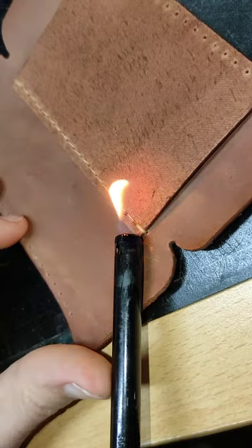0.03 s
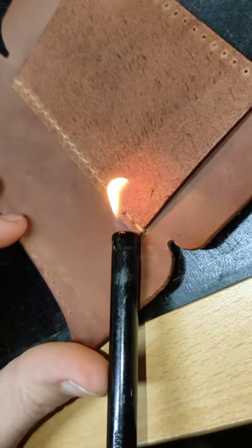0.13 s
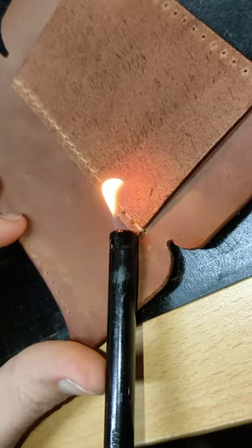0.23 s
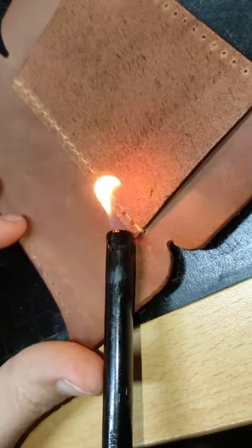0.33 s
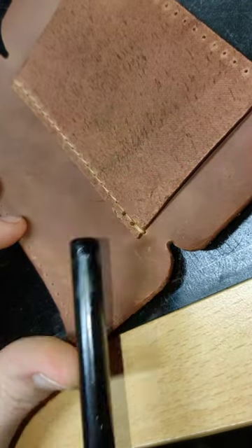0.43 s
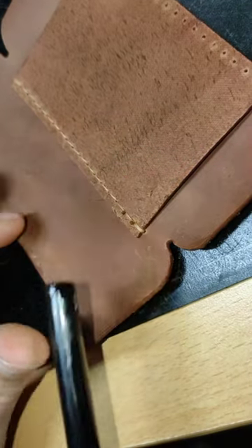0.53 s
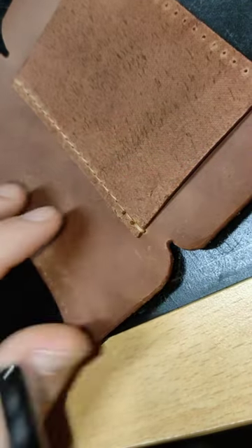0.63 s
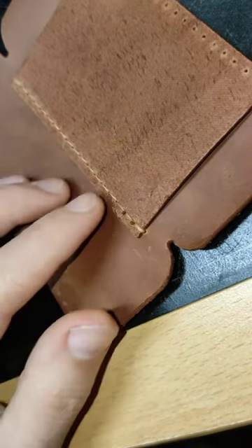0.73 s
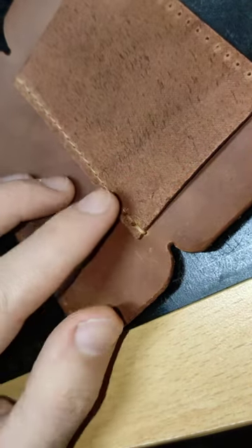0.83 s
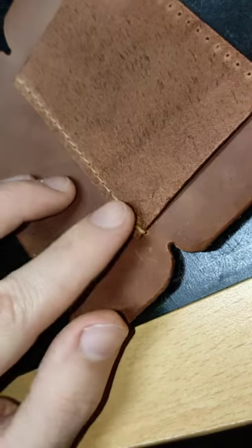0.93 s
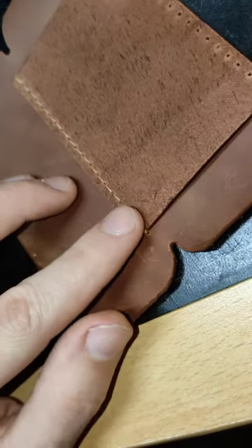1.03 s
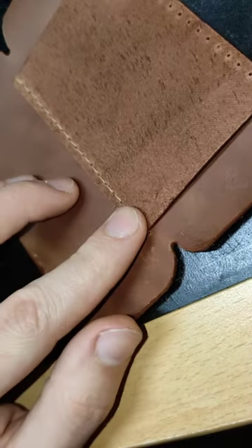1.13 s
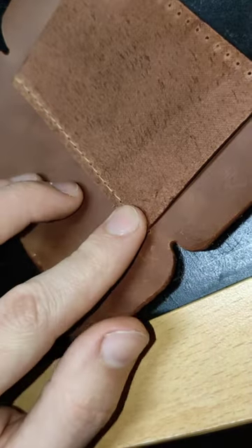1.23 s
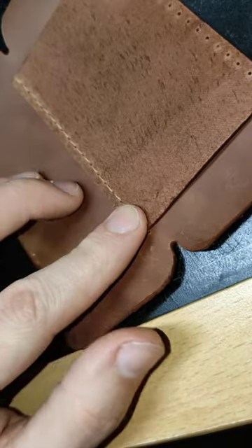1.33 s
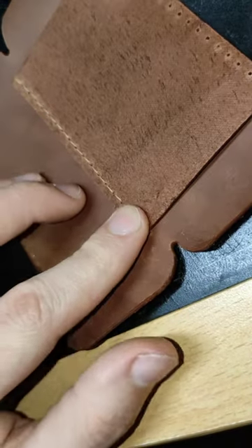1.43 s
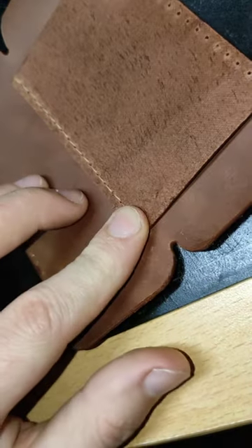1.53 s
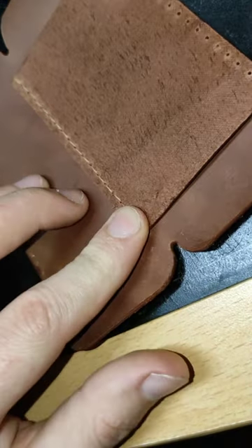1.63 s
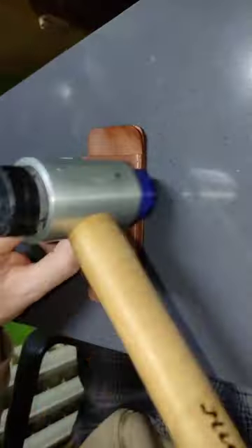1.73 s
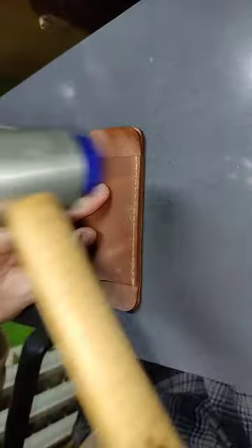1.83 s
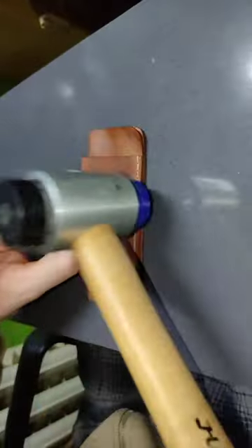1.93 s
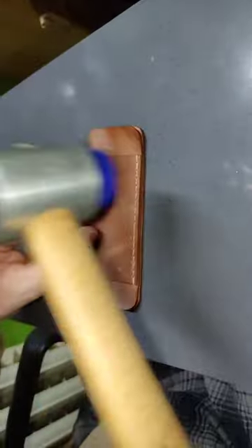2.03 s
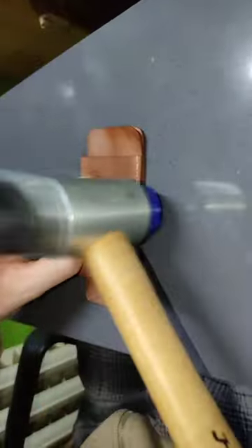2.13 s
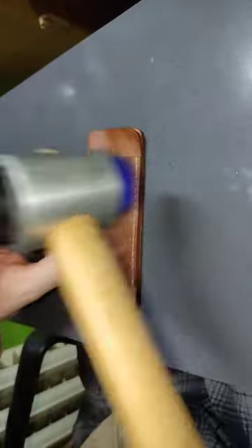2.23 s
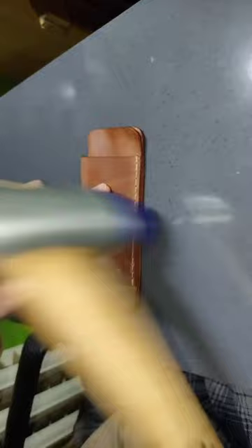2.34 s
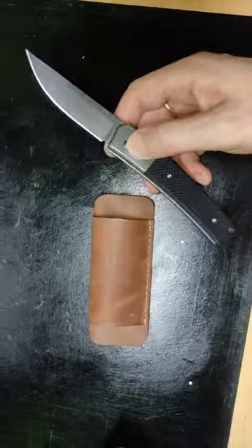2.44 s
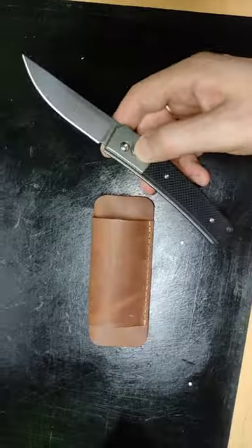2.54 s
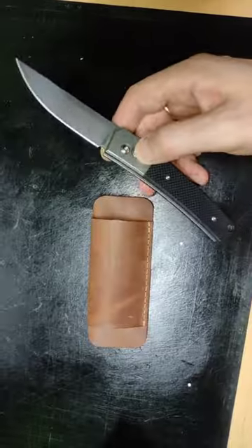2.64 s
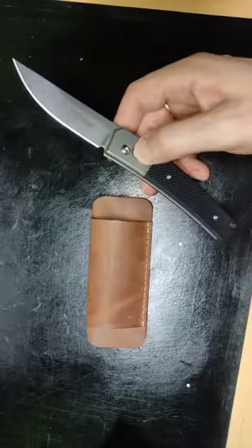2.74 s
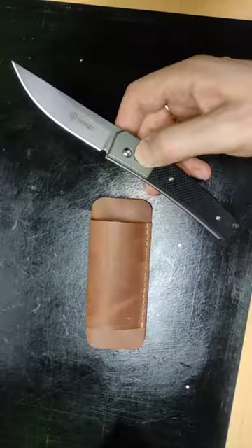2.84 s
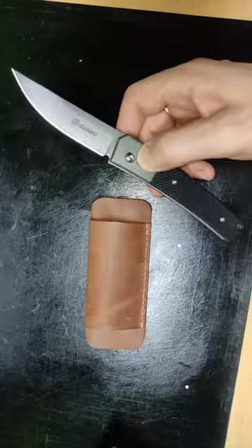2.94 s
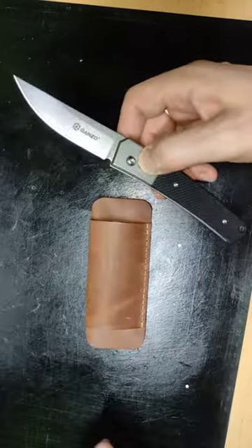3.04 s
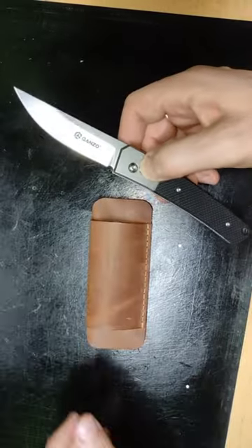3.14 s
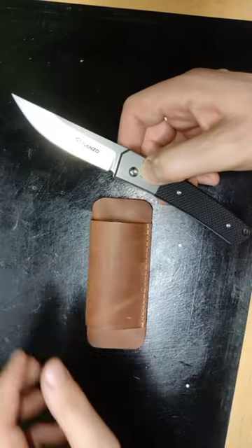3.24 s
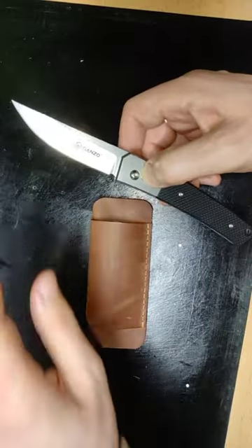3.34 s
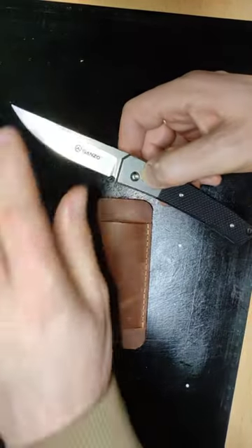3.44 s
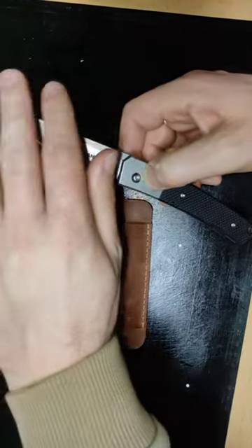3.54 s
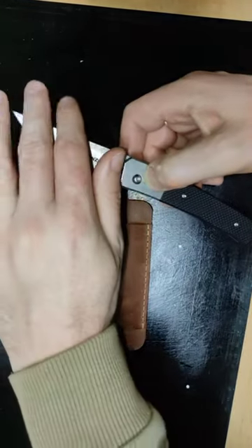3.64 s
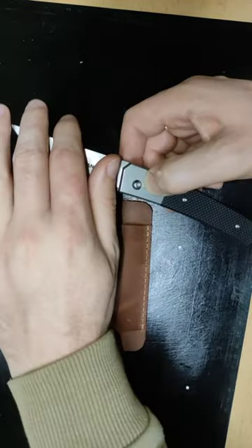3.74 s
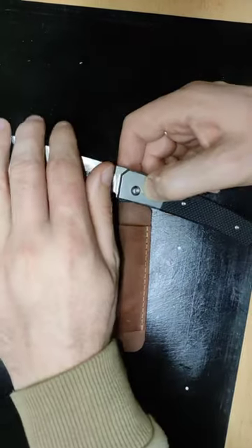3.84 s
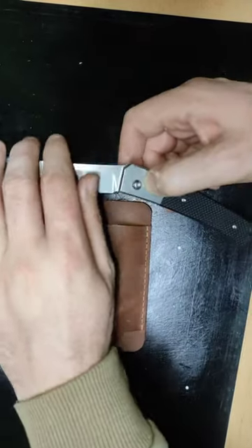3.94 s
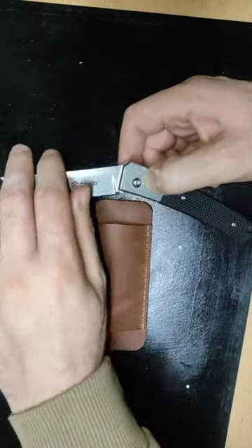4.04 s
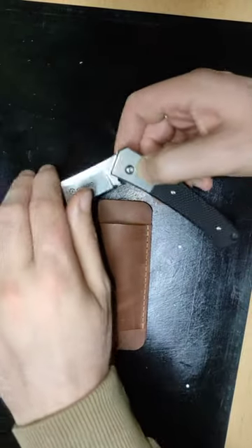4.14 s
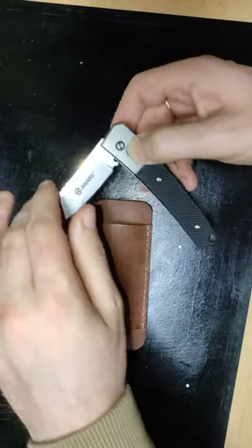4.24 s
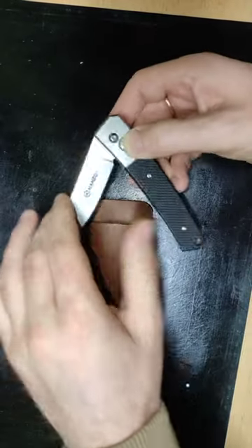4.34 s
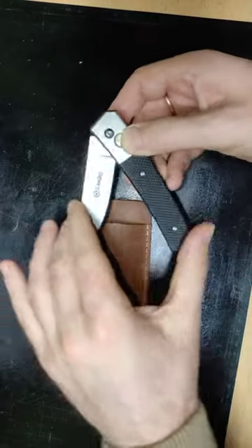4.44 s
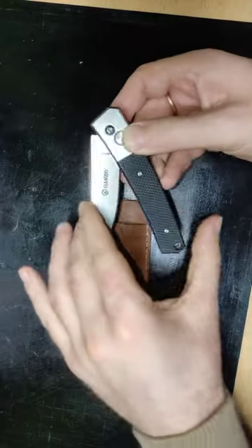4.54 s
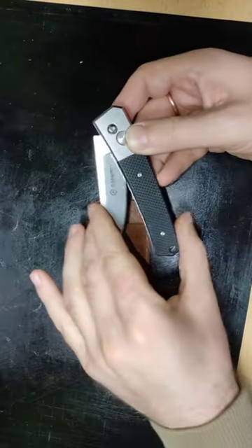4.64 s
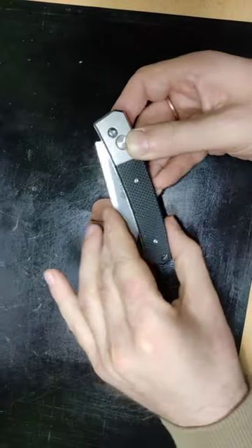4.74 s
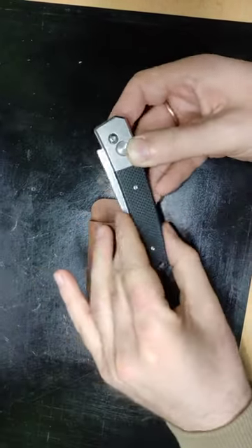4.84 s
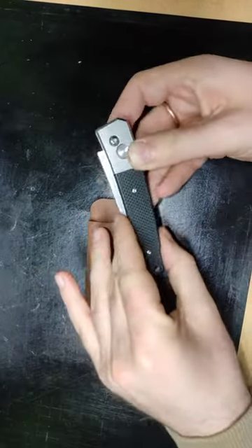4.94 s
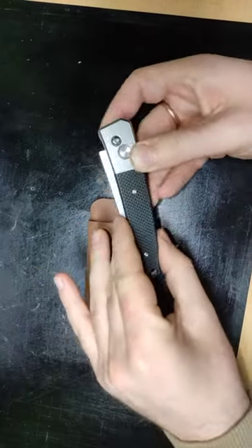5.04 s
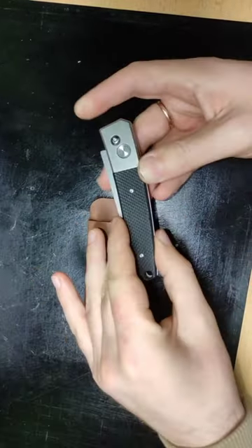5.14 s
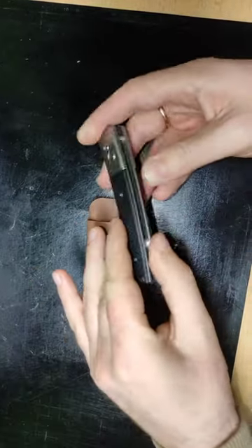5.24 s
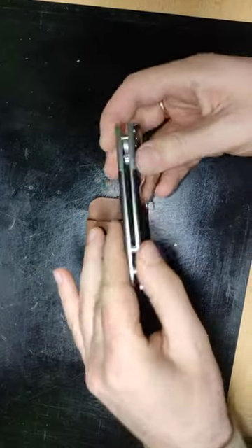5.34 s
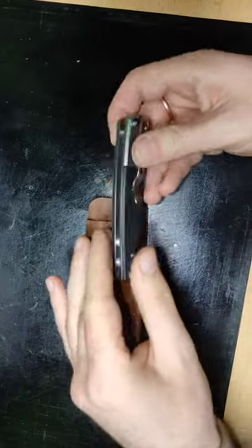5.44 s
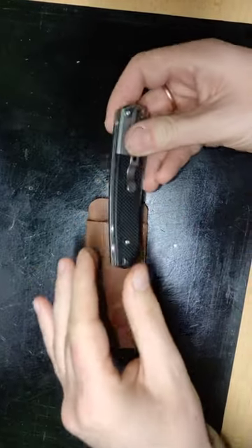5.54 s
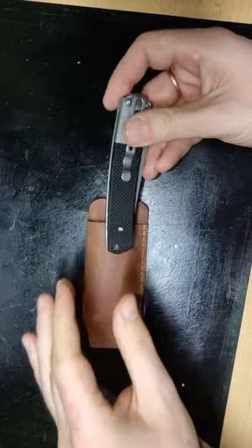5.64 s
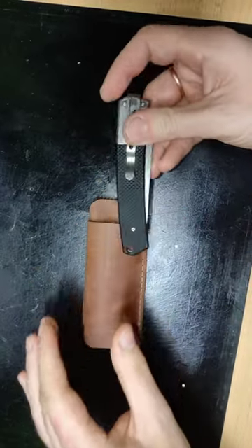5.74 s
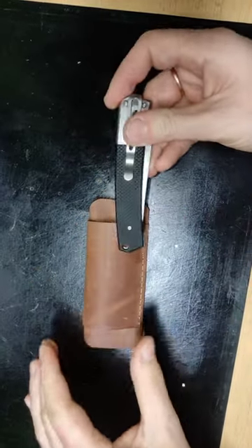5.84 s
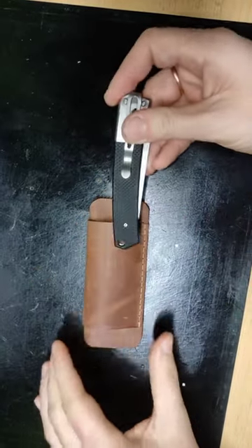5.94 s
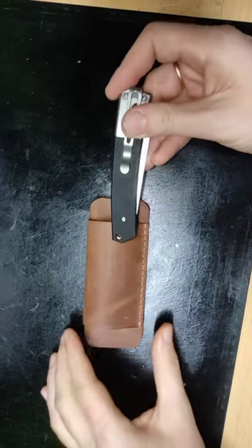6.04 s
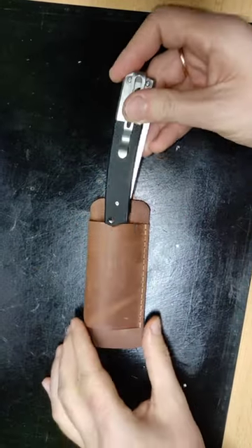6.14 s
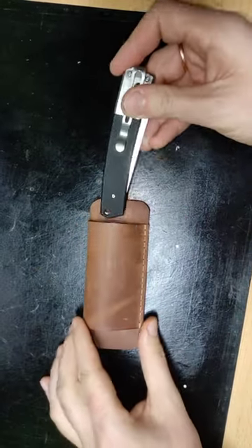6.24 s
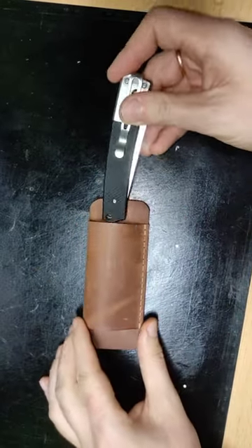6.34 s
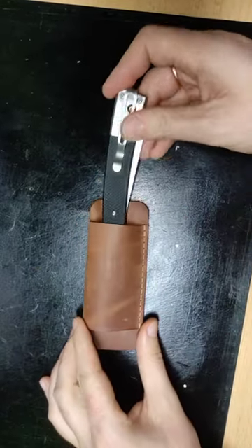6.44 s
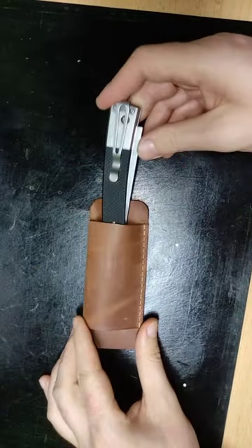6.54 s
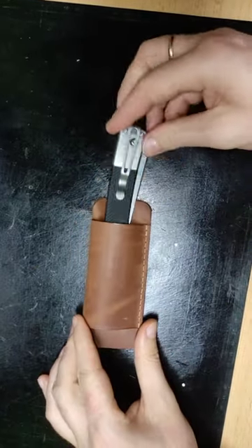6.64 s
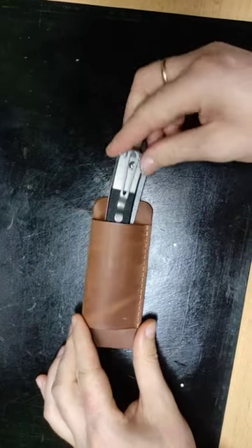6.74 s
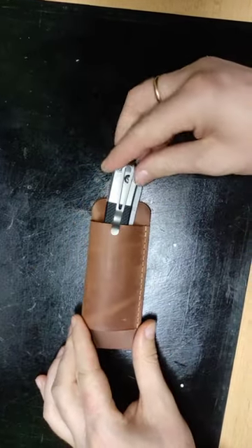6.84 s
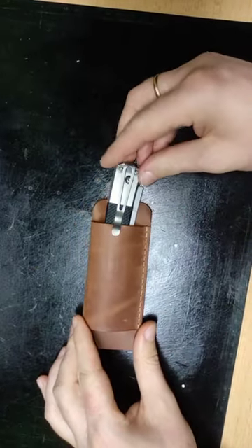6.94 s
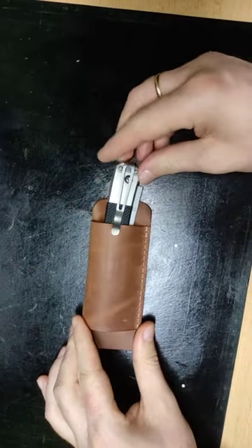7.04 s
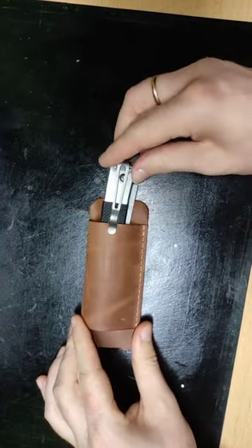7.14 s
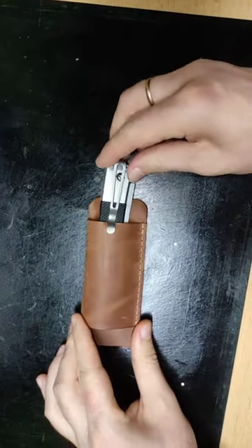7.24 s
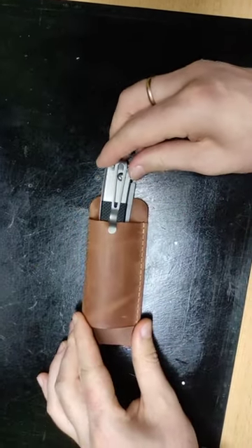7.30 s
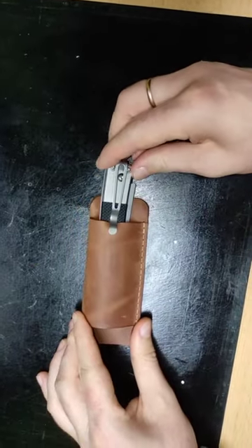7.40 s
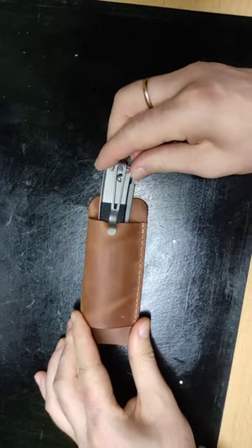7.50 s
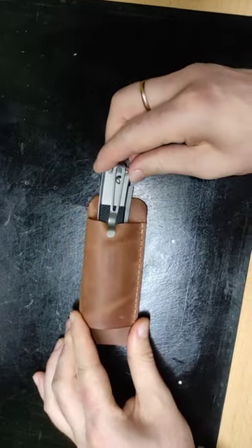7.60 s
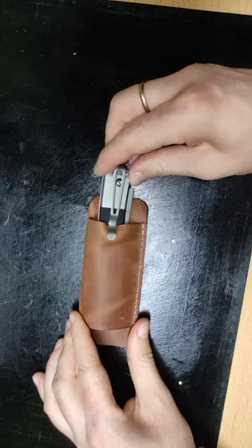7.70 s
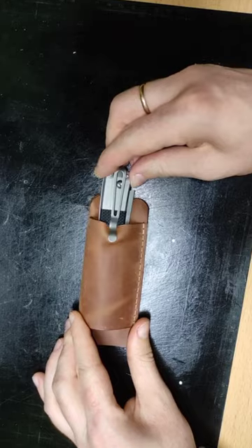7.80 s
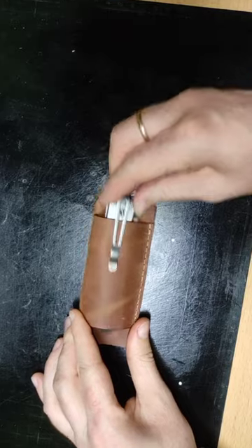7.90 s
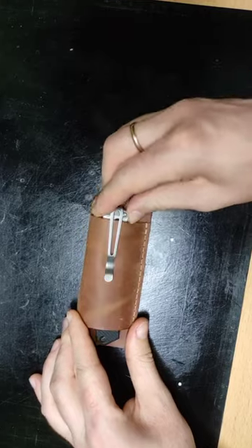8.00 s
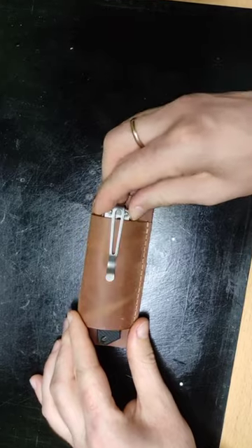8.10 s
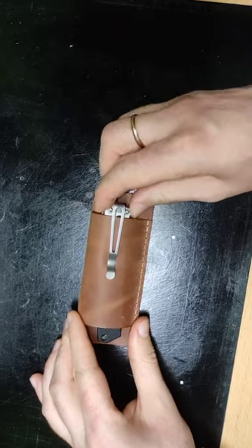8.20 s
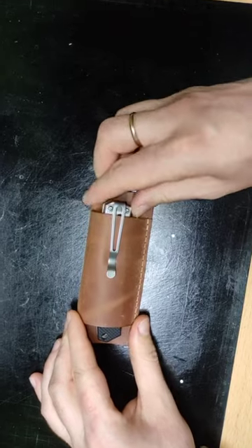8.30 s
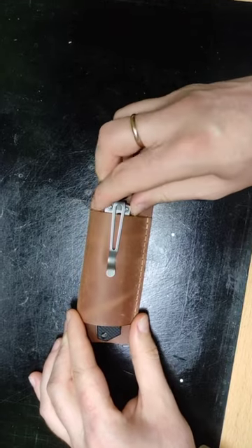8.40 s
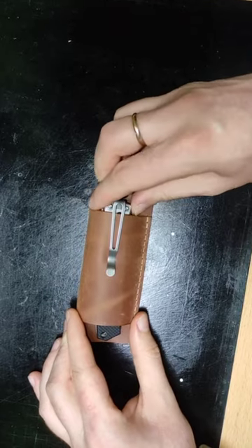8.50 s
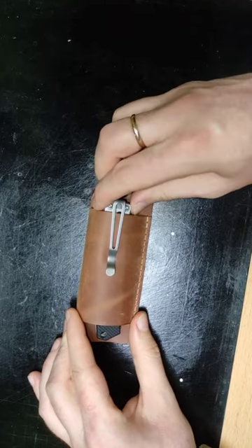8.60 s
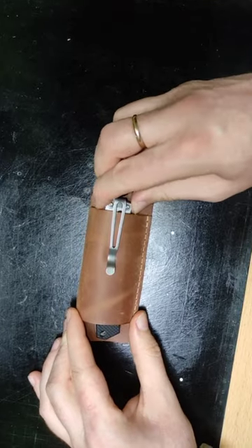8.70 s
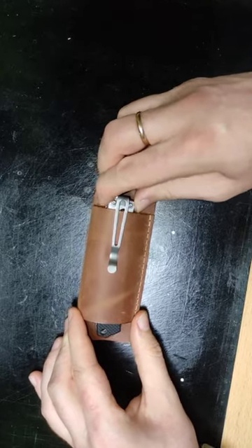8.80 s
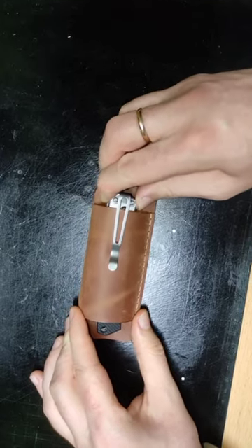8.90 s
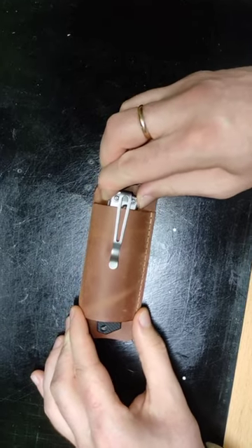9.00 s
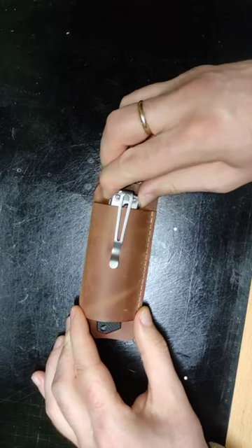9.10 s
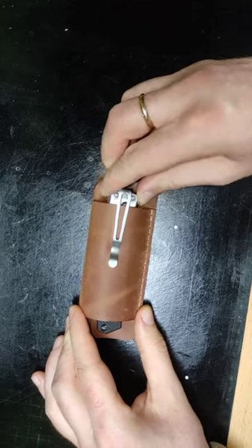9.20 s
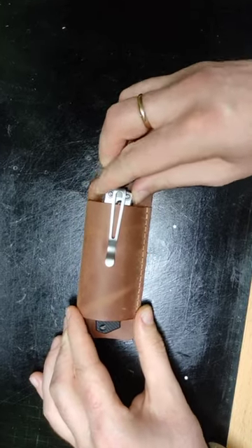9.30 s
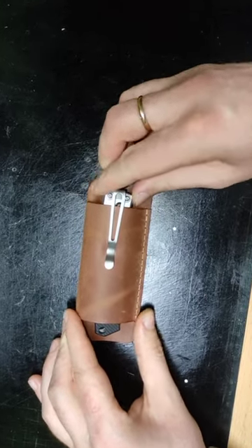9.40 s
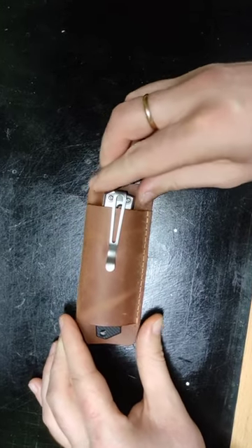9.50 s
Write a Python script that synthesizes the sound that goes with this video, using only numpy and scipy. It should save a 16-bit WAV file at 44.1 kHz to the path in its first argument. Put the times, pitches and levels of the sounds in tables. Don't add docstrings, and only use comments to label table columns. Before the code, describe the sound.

Close lighter clicks, four hard mallet thuds, small steel ticks of a closing knife, then leather rubbing, dry snaps and two sharp knocks.

```python
import sys
import numpy as np
from scipy import signal
from scipy.fft import rfft, irfft, next_fast_len
from scipy.io import wavfile
from scipy.ndimage import uniform_filter1d

SR = 44100
rng = np.random.default_rng(int(sys.argv[2]) if len(sys.argv) > 2 else 0)


def store_pcm(level_fs):
    pcm = np.round(np.clip(level_fs, -1, 1) * 32767).astype(np.int16)
    wavfile.write(sys.argv[1], SR, np.atleast_2d(pcm).T)


def attenuation_scalar(level_db):
    decades = np.asarray(level_db, float) / 20
    return 10 ** decades


N = 421596
T = np.arange(N) / SR
USUAL_TICK_DB = -45.5


def unit(x):
    return x / np.sqrt(np.mean(x ** 2))


def colour(x, points):
    size = next_fast_len(x.shape[-1])
    hz = np.arange(size // 2 + 1) * SR / size
    f, db = np.transpose(points)
    gain = attenuation_scalar(np.interp(np.log(hz + 1), np.log(f), db))
    return irfft(rfft(x, size) * gain, size)[..., :x.shape[-1]]


def ring(push, modes):
    out = 0
    for hz, db, t60_s in modes:
        pole = np.exp(2j * np.pi * hz / SR - np.log(1000) / (t60_s * SR))
        out = out + attenuation_scalar(db) * signal.lfilter([1], [1, -pole], push).imag
    return out


def struck(push, points):
    f, db = np.transpose(points)
    hz = np.linspace(1, SR / 2, len(push) // 2 + 1)
    cepstrum = irfft(np.log(attenuation_scalar(np.interp(np.log(hz), np.log(f), db))))
    cepstrum[1:len(hz) - 1] *= 2
    cepstrum[len(hz):] = 0
    return irfft(rfft(push) * np.exp(rfft(cepstrum)))


def contact(rough_s, rough, size=2048, lead_s=0.):
    t = np.arange(size) / SR - lead_s
    decay = -t / max(rough_s, 1e-4)
    rise = 2 * t / max(lead_s, 1e-9)
    push = rough * rng.standard_normal(size) * np.exp(np.minimum(decay, rise))
    push[int(lead_s * SR)] = -1
    return push


def add(track, s, sound, db):
    start = int(s * SR)
    part = sound[:N - start]
    track[start:start + len(part)] += part * attenuation_scalar(db) / np.abs(sound).max()


def sides(x, pan_db):
    return x * attenuation_scalar(np.array([[pan_db], [-pan_db]]) / 2)


def late_left(pair, lag_samples, balance=None):
    left, right = pair
    if balance is not None:
        half = np.array(balance) * [1, .5]
        left, right = colour(left, half), colour(right, half * [1, -1])
    return np.array([np.roll(left, lag_samples), right])


# freq_hz, level_db, t60_s
ROOM_DECAY = [(120, -7, 0.58), (300, -2.5, .3), (774, 0, 0.28), (2000, -1.5, 0.32), (4960, -3.5, 0.3),
              (10000, -1, 0.19), (15100, -6, 0.25)]


def room(x, wet_db, damping=1., balance=None):
    hz, t, cells = signal.stft(rng.standard_normal((2, SR // 2)), SR, nperseg=512)
    f, db, t60_s = np.transpose(ROOM_DECAY)
    db = np.interp(np.log(hz + 1), np.log(f), db)[:, None]
    t60_s = np.interp(np.log(hz + 1), np.log(f), t60_s)[:, None]
    tail = signal.istft(cells * attenuation_scalar(db - 60 * damping * t / t60_s), SR, nperseg=512)[1]
    tail = late_left(tail, 0, balance)
    tail = tail * np.clip((T[:tail.shape[1]] - .002) / 0.00047, 0, 1)
    tail = tail / np.sqrt(np.sum(tail ** 2) / 2)
    return attenuation_scalar(wet_db) * signal.oaconvolve(x, tail, axes=1)[:, :N]


# freq_hz, left_minus_right_db
ECHO_SIDES = [(100, 3), (1000, 0), (4000, -2.5), (7500, -7.5), (10500, -0.5), (15000, 0.5)]


def echoes(events, points, wet_db, damping=0.81):
    feed, body = np.zeros(N), struck(contact(1, 0), points)
    for s, db, *_ in events:
        add(feed, s, body, db)
    feed = feed * np.abs(body).max() / np.linalg.norm(body)
    return room(feed[None], wet_db, damping, ECHO_SIDES)


def grains(per_s, spread_db):
    slips = (rng.random(N) < per_s / SR) * rng.standard_normal(N)
    return unit(slips * attenuation_scalar(spread_db * rng.exponential(size=N)))


def flicker(per_s, depth_db):
    k = int(SR / per_s)
    steps = np.repeat(rng.standard_normal(N // k + 1), k)[:N]
    return attenuation_scalar(depth_db * uniform_filter1d(steps, k))


def stroke(start_s, hardest_s, end_s, db):
    edge_db = -25
    out = np.zeros(N)
    first = max(int((3 * start_s - 2 * hardest_s) * SR), 0)
    near = slice(first, int((3 * end_s - 2 * hardest_s) * SR))
    rise = (T[near] - hardest_s) / (hardest_s - start_s)
    fall = (hardest_s - T[near]) / (end_s - hardest_s)
    out[near] = attenuation_scalar(db - edge_db * np.minimum(rise, fall))
    return out


# freq_hz, level_db, t60_s
DESK_MODES = [(128, -12, 0.14), (222.5, 1, .07), (318, -5.5, 0.05)]


def desk(push):
    high_pass = signal.butter(2, 80, "high", fs=SR, output="sos")
    return signal.sosfilt(high_pass, ring(push, DESK_MODES))


# freq_hz, density_db_per_hz
HISS_COLOUR = [(12, -51), (20, -30), (96, -2.5), (194, -3.5), (257, -6), (403, -8), (597, -14.5),
               (835, -15), (909, -17.5), (1640, -21), (2110, -24.5), (15000, -36.5), (16400, -41.5)]


def hiss():
    noise = unit(colour(rng.standard_normal((2, N)), HISS_COLOUR))
    return sides(noise * attenuation_scalar(-62) * flicker(4.9, .7), -2.5)


# start_s, peak_db, ring_hz, left_minus_right_db
BUMPS = [(0.097, -42.5, 230, 26), (1.49, -54.5, 126.4, 14), (2.83, -59.5, 172, 3.5),
         (2.857, -45.5, 174.4, 15), (4.3109, -44, 110, 29), (4.707, -49, 252, 13),
         (4.905, -47.5, 100.7, 32), (4.9092, -46.5, 350, 35), (4.9257, -46.5, 110, 28),
         (4.9274, -47.5, 300, 32), (6.9888, -44.5, 189, 9), (7.992, -39.5, 170.5, 15.5),
         (8.143, -51, 185, 29), (8.7915, -45.5, 232, 29), (8.804, -44, 261.4, 34), (8.8218, -42, 229, 30),
         (8.8327, -33.5, 328, 21), (8.932, -45.5, 277, 21), (9.192, -41, 252, 34), (9.226, -38.5, 254, 33),
         (9.2464, -44, 329.8, 30), (9.458, -34, 286, 29.5)]
# start_s, peak_db, ring_hz, left_minus_right_db
KNOCKS = [
    (4.3114, -39, 278, 34),
    (9.139, -15, 343, 11.5),
    (9.1446, -17, 355, 16),
    (9.2518, -16, 340, 16),
    (9.2585, -18.5, 332, 14),
]
# freq_hz, density_db_per_hz
KNOCK_CRACK = [(500, -8), (1500, 6), (4000, -10), (8000, -15.5), (16000, -35)]


def bumps():
    out, t = np.zeros((2, N)), T[:SR // 10]
    for s, db, hz, pan_db in BUMPS + KNOCKS:
        soft, sharp = (-np.diff(np.exp(-(t * hz / cycles - 2.5) ** 2), prepend=0) for cycles in (.2, .03))
        add(out[0], s, ring(soft, [(hz, 0, 4.4 / hz)]), db + 7.0)
        add(out[1], s, ring(sharp, [(1.96 * hz, 0, 2.64 / hz)]), db + 16.0 - pan_db)
    for s, db, *_ in KNOCKS:
        crack = struck(contact(0.0023, 0.41), KNOCK_CRACK)
        for side in out:
            add(side, s, crack, db - 21.5)
    return out


# start_s, peak_db, first_hz, second_hz, second_over_first_db
LIGHTER_CLICKS = [
    (0.2157, -20.5, 1700, 8130, 8.5),
    (0.311, -32, 1570, 4500, -25),
    (0.344, -37, 3700, 8400, -5),
    (0.384, -43.5, 6000, 8800, 2),
    (0.402, -31.5, 3350, 8200, -4),
    (0.4077, -41, 2000, 8000, 6),
    (0.4539, -14, 1800, 3140, 28),
    (0.5026, -3.5, 3400, 8960, -2),
]
# freq_hz, density_db_per_hz
LIGHTER_COLOUR = [(180, -36), (400, -21), (700, -13), (1000, 5.5), (1840, -7.5), (2740, -9.5), (3290, -1.5),
                  (3890, -11), (4600, -4), (5520, -9.5), (7320, -16.5), (8640, -13), (10900, -18.5),
                  (15000, -18.5), (16000, -30.5)]
# freq_hz, density_db_per_hz
LIGHTER_TAIL = [(240, -54.5), (400, -21.5), (1250, -8.5), (3160, -9.5), (3700, -14.5), (4500, -8.5),
                (6540, -10.5), (15000, -16), (16000, -35.5)]
# freq_hz, left_minus_right_db
LIGHTER_SIDES = [(500, 0.5), (1300, 3), (2000, 1.5), (2800, -8.5), (4000, -14.5), (6000, -14),
                 (8500, -21.5), (14000, -9)]


def lighter():
    rattle_s, rattle_db, rattle_hz, rattle_t60_s = .545, -35, 1480, .018
    spring_hz, spring_db, spring_t60_s = 1244, -46.5, 0.67
    out = np.zeros(SR)
    for s, db, first_hz, second_hz, second_db in LIGHTER_CLICKS:
        push = contact(0.0009, 0.23, lead_s=0.00054)
        notes = ring(push, [(first_hz, 0, .0045), (second_hz, second_db, .0045)])
        add(out, s, unit(struck(push, LIGHTER_COLOUR)) + 0.63 * unit(notes), db)
    add(out, rattle_s, ring(contact(1, 0), [(rattle_hz, 0, rattle_t60_s)]), rattle_db)
    near = np.pad(late_left(sides(out, 0), 22, LIGHTER_SIDES), ((0, 0), (0, N - SR)))

    since_s = np.clip(T - LIGHTER_CLICKS[-1][0], 0, None)
    spring = attenuation_scalar(spring_db - 60 * since_s / spring_t60_s) * np.sin(2 * np.pi * spring_hz * since_s)
    spring = spring * np.clip(since_s / 0.022, 0, 1)
    far = sides(echoes(LIGHTER_CLICKS, LIGHTER_TAIL, wet_db=-4.0, damping=1.0), -2.2)
    return near + far + spring


# start_s, hardest_s, end_s, level_db
FINGERS = [
    (0.336, 0.401, 0.44, -63.5),
    (0.416, 0.428, 0.43, -49.5),
    (0.422, 0.461, 0.45, -42),
    (0.547, 0.718, 0.99, -71),
    (2.95, 3.021, 3.08, -66),
    (3.047, 3.399, 3.9, -73.5),
    (3.98, 4.211, 4.56, -77),
    (4.35, 4.597, 4.8, -75.5),
    (5.255, 5.417, 5.82, -70.5),
    (6.0, 6.18, 6.35, -74),
]
# freq_hz, density_db_per_hz
SKIN = [(1500, -18.5), (3000, -0.5), (6000, -5), (9000, -6), (13000, -4.5), (16300, -23.5)]
# start_s, hardest_s, end_s, hiss_db, sheath_over_hiss_db
DRAGS = [(6.387, 6.406, 6.647, -53.5, -3), (6.53, 6.597, 6.8, -53.5, -5), (6.64, 6.765, 6.86, -56, -6),
         (6.704, 6.8, 6.88, -59, -4.5), (6.72, 6.827, 6.86, -54.5, -3), (7.055, 7.139, 7.53, -68.5, 7.5),
         (7.25, 7.401, 7.85, -90, 11), (7.659, 7.7, 7.78, -69, 5), (7.685, 7.78, 7.85, -66, 2),
         (7.878, 7.885, 7.94, -45, 2), (7.877, 7.934, 8.0, -45, 6.5), (7.92, 7.974, 7.995, -53.5, -2),
         (8.18, 8.28, 8.38, -66, 0.5), (8.366, 8.469, 8.53, -72, 24), (8.46, 8.54, 8.63, -66.5, -7),
         (8.705, 8.724, 8.84, -74, 16), (8.766, 8.843, 8.96, -78, 11), (9.014, 9.088, 9.16, -79, 12),
         (9.145, 9.267, 9.48, -73.5, 5)]
# freq_hz, density_db_per_hz
RUB_COLOUR = [(1600, -36), (1950, -5), (2120, 6), (4500, 5), (6500, -2.5), (8500, -4), (11000, -12.5),
              (15000, -7), (16300, -43)]
# start_s, hardest_s, end_s, level_db
LEANS = [
    (7.4, 7.702, 7.65, -67),
    (7.86, 7.94, 8.03, -49.5),
    (8.0, 8.15, 8.3, -70),
]
# freq_hz, density_db_per_hz
SHEATH = [(300, -27), (500, -19.5), (700, -5.5), (940, -4.5), (1250, -9), (1450, -0.5), (1630, -1),
          (1800, -8), (2100, -9.5), (2800, -42)]
# freq_hz, left_minus_right_db
SHADOW = [(60, -3.5), (110, -5.5), (200, 3.5), (380, -1.5), (700, -9.5), (1290, 6), (2380, 0), (4400, -15),
          (8120, -19.5), (15000, -1.5)]
# freq_hz, gain_db
NOTCH = [(1780, 0), (1880, -22), (2020, -22), (2110, 0)]


def rubbing():
    mouth_hz, mouth_t60_s, mouth_db, mouth_until_s = 1640, .02, 4.5, 6.9
    drags = [stroke(*row[:4]) for row in DRAGS]
    pressure = sum(drags)
    hollow = sum(drag * attenuation_scalar(row[4]) for drag, row in zip(drags, DRAGS))
    slips = grains(10000, 1.8) * flicker(60, 1.8)
    touch = sum(stroke(*row) for row in FINGERS)
    out = pressure * unit(colour(slips, RUB_COLOUR)) + touch * unit(colour(slips, SKIN))

    sings = attenuation_scalar(mouth_db) * unit(ring(slips, [(mouth_hz, 0, mouth_t60_s)]))
    sings = sings * np.clip((mouth_until_s - T) / 0.18, 0, 1)
    leather = unit(colour(slips + 0.66 * grains(2300, 2.9), SHEATH))
    body = hollow * (leather + sings * flicker(40, 3.2))

    load = attenuation_scalar(-37) * hollow ** 0.4 + sum(stroke(*row) for row in LEANS)
    load = load + stroke(.55, .605, .68, -57)
    body = body + load * flicker(30, 5.7) * unit(desk(grains(1400, 1.2)))

    out = late_left(sides(out, 0), 16, SHADOW) + late_left(sides(body, -1.7), 9)
    out = colour(out, NOTCH)
    return out + room(out, -14)


# start_s, peak_db, head_over_thud_db, crack_over_thud_db, crack_hz
BLOWS = [
    (1.621, -11, -13, -4, 2980),
    (1.7424, 1, -13.5, 0, 6930),
    (1.9508, 1, -8, -4, 3880),
    (2.1495, 2, -16, -4.5, 3240),
    (2.3693, -0.5, -5, -1, 6708),
]
TOUCH_DB = [-21, -6, -4, -11, -3]
SECOND_HZ = [7000, 8800, 7100, 8640, 7650]
# start_s, peak_db, thud_over_tick_db
REBOUND = [
    (1.785, -40, 18.5),
    (2.004, -40.5, 13.5),
    (2.1585, -22, 11.5),
    (2.1934, -11, -8.5),
]
# freq_hz, level_db, t60_s
REBOUND_MODES = [(2800, 0, 0.0084), (5000, -8, 0.0054), (7740, -9.5, .006), (10000, -20.5, .004)]
HEAD_MODES = [(1366, 2, 0.017), (2780, -7.5, 0.0079), (1000, -7, .008)]
# freq_hz, density_db_per_hz
MALLET_COLOUR = [(60, -18.5), (120, -11), (200, -11), (385, 0), (500, -9), (660, -1.5), (900, 1),
                 (1300, -4), (1600, -10.5), (2050, -28.5), (2850, -29.5), (6000, -46.5), (16000, -69.5)]
CRACK = [(900, -23), (2000, -12.5), (2800, 1), (4000, -0.5), (6500, 0), (9500, -7), (12000, -17.5),
         (15500, -28)]
# freq_hz, density_db_per_hz
MALLET_TAIL = [(41, -51.5), (70, -17), (376, -4), (779, -10.5), (1700, -15.5), (2020, -24), (2910, -21.5),
               (7560, -26.5), (10900, -39), (12800, -32), (14300, -38), (14900, -55.5), (16000, -85)]
# freq_hz, left_minus_right_db
MALLET_SIDES = [(60, 12), (110, 9), (200, 2), (380, -0.5), (700, 2), (1290, 1.5), (2380, -3), (4400, -14.5),
                (8120, -11.5), (15000, -6.5)]
CRACK_SIDES = [(1500, 2.5), (2400, 0.5), (4000, -11), (7000, -8), (11000, -5.5), (15000, -8.5)]


def mallet():
    shot_start_s, shot_end_s = 1.675, 2.381
    thud_after_s, thud_db = .0007, -2
    edge_after_s, edge_width_s = .0004, .00017
    kick_after_s, kick_width_s, kick_left_db, kick_right_db = .0021, .00022, -18, -12
    first_echo = (.0092, -21.5)  # delay_s, loss_db
    out, cracks, kicks = np.zeros(3 * SR), np.zeros(3 * SR), np.zeros((2, 3 * SR))
    kick = -np.exp(-(T[:200] / kick_width_s - 2) ** 2)
    edge = -np.exp(-(T[:200] / edge_width_s - 2) ** 2)
    edge = signal.sosfilt(signal.butter(1, 390, "high", fs=SR, output="sos"), edge)

    for (s, db, head_db, crack_db, crack_hz), touch_db, second_hz in zip(BLOWS, TOUCH_DB, SECOND_HZ):
        chatter = contact(0.00048, 1.0, lead_s=.0003)
        push = np.r_[-1, np.zeros(len(chatter) - 1)]
        thud = struck(push, MALLET_COLOUR)
        head = -np.diff(ring(push, HEAD_MODES), prepend=0)
        notes = ring(chatter, [(crack_hz, 0, .004), (second_hz, -3, .006)])
        crack = unit(struck(chatter, CRACK)) + 0.39 * unit(notes)
        for late_s, loss_db in ((0, 0), first_echo):
            add(out, s + thud_after_s + late_s, thud, db + thud_db + loss_db)
            add(out, s + late_s, head, db + head_db + loss_db)
            add(cracks, s + late_s, crack, db + crack_db + loss_db - 1.5)
        add(out, s + edge_after_s - 2 * edge_width_s, edge, db + touch_db)
        for side, kick_db in zip(kicks, (kick_left_db, kick_right_db)):
            add(side, s + thud_after_s + kick_after_s, kick, db + kick_db)

    for s, db, thud_db in REBOUND:
        push = contact(0.00073, 0.042)
        add(cracks, s, ring(uniform_filter1d(push, size=3), REBOUND_MODES), db)
        add(out, s, struck(push, MALLET_COLOUR), db + thud_db)

    near = late_left(sides(out, 0), 7, MALLET_SIDES) + late_left(sides(cracks, 0), 4, CRACK_SIDES)
    near = near + late_left(kicks, 14)
    out = np.pad(near, ((0, 0), (0, N - near.shape[1]))) + echoes(BLOWS, MALLET_TAIL, wet_db=0.5)
    return out * np.clip(np.minimum(T - shot_start_s, shot_end_s - T) / 0.0006, 0, 1)


# start_s, peak_db, handle_over_steel_db, brightest_hz, note_over_steel_db
KNIFE_TICKS = [(2.8613, -47, -2, 6400, 2), (2.9626, -52, -14, 6700, 9), (3.0067, -55.5, -14, 3670, 7),
               (3.0195, -51, -10, 5140, 14), (3.185, -41, -20, 6980, 2.5), (3.93, -54.5, -15, 6850, -4),
               (4.5555, -54, -16, 3914, -4), (4.679, -47, -13, 3846, -3), (4.8479, -32, -20, 9560, -2),
               (4.851, -35.5, -13.5, 9070, -19), (4.8543, -42, -10, 6430, -2),
               (5.1592, -40, -26, 3770, -2.5), (5.5432, -47, -9.5, 3610, -2.5),
               (6.1794, -57.5, -3, 3477, 3)]
# freq_hz, density_db_per_hz
STEEL = [(1060, -64), (1800, -40), (2950, -8), (3320, -33), (3710, -12), (7990, -5), (9080, -1),
         (10900, -12), (13100, -2), (15000, -16), (16000, -34)]
# freq_hz, level_db, t60_s
HANDLE_MODES = [(1141, -5.5, 0.051), (1327, -1.5, 0.023), (1610, 2, 0.025), (1800, -8, 0.03),
                (2309, -1, 0.029)]
# freq_hz, density_db_per_hz
KNIFE_TAIL = [(500, -12), (1300, 5), (2500, -7), (4500, -4), (8700, -1.5), (10900, -3), (12500, 6),
              (15300, -6)]


def knife():
    out = np.zeros((2, N))
    for s, db, handle_db, bright_hz, note_db in KNIFE_TICKS:
        pan_db = -9.5 - 0.5 * (db - USUAL_TICK_DB)
        push = contact(0.004, 0.22)
        steel = struck(push, STEEL)
        steel = steel / steel.std() + attenuation_scalar(note_db) * unit(ring(push, [(bright_hz, 0, .011)]))
        for side, sign in zip(out, (1, -1)):
            add(side, s, steel, db + sign * pan_db / 2)
            add(side, s, ring(push, HANDLE_MODES), db + handle_db + 9.0)
    return late_left(out, 11) + echoes(KNIFE_TICKS, KNIFE_TAIL, wet_db=6.0)


# start_s, peak_db, sheath_over_snap_db, left_minus_right_db
SLIPS = [(6.3325, -50.5, 7, 0), (6.3844, -43, -2, -14), (6.4443, -44.5, -20, -20),
         (6.9391, -48.5, -2.5, -16), (7.0239, -46.5, -5, -9.5), (7.0763, -48, -1, -12),
         (7.133, -48.5, 4, -8), (7.1456, -44, -15, -1), (7.1521, -41.5, -4, -11), (7.1674, -44.5, 6.5, -10),
         (7.216, -49, 9, -8), (7.2244, -50, 8, -6), (7.3058, -51, -10, -9), (7.3407, -49.5, 2.5, -12),
         (7.3532, -48.5, 0.5, -17), (7.432, -44.5, -8, -21), (7.441, -44, 0, -31), (7.5575, -40, -3.5, -22),
         (7.676, -41.5, -2, -20.5), (7.6944, -48, 1.5, -7), (7.8805, -40, -1, -14), (7.8845, -37, 1, -13),
         (7.99, -44, -6, -10)]
SLIP_HZ = [2990, 2910, 4300, 6530, 3380, 3390, 3000, 3380, 4730, 2680, 3670, 2570, 3610, 4060, 3700, 4480,
           5960, 5900, 5440, 3580, 4030, 8700, 4400]
# start_s, peak_db, sheath_over_snap_db, left_minus_right_db
PRESSES = [(8.1105, -48.5, 1, -11), (8.2199, -45.5, -3, -13), (8.2843, -39, 1, -14.5), (8.3858, -43, 0, -7),
           (8.4051, -39.5, -2, -15), (8.4576, -42, 2.5, -20.5), (8.4746, -51, 11, -4), (8.534, -50, 6, -19),
           (8.592, -57, 1, -7), (8.6038, -45, -20, -14), (8.7177, -42.5, 9.5, -8.5), (8.7432, -43, 5, -21),
           (8.765, -48.5, -8, -11), (8.8494, -54.5, 13, -5), (8.879, -53, 12, 2), (9.038, -52, -3, -8),
           (9.0414, -43.5, 4.5, -8), (9.0689, -43, 8.5, -23), (9.4846, -46.5, -18, -8),
           (9.5001, -44.5, 5.5, -14), (9.5198, -48, 4, -19)]
PRESS_HZ = [4400, 6800, 4400, 2830, 3630, 2940, 3420, 2470, 3000, 6070, 3000, 6600, 8790, 3000, 2760, 5470,
            4500, 9200, 3020, 6620, 4960]
# freq_hz, density_db_per_hz
SNAP = [(1060, -17), (1800, -3.5), (3510, -6), (5850, 0), (7290, -10.5), (8280, 1), (10400, -21),
        (14200, -13), (16000, -37)]
# freq_hz, density_db_per_hz
TICK_TAIL = [(500, 2), (1500, 2), (4000, -2.5), (8000, -12.5), (15000, -18.5)]


def ticks():
    slip_desk_db, slip_chatter_ms = -12.5, 2.34
    press_desk_db, press_chatter_ms = -3.5, 2.6
    snaps, body = np.zeros((2, N)), np.zeros(N)
    for table, notes_hz, desk_db, usual_ms in ((SLIPS, SLIP_HZ, slip_desk_db, slip_chatter_ms),
                                               (PRESSES, PRESS_HZ, press_desk_db, press_chatter_ms)):
        for (s, db, sheath_db, pan_db), note_hz in zip(table, notes_hz):
            chatter_ms = usual_ms + 0.29 * (db - USUAL_TICK_DB)
            push = contact(chatter_ms / 1000, 0.25, lead_s=0.00079)
            snap = unit(struck(push, SNAP)) + 0.64 * unit(ring(push, [(note_hz, 0, .004)]))
            add(snaps[0], s, snap, db + pan_db / 2)
            add(snaps[1], s, snap, db - pan_db / 2)
            add(body, s, struck(push, SHEATH), db + sheath_db + 0.5)
            add(body, s, desk(push), db + desk_db + 0.41 * sheath_db)
    near = late_left(snaps, 13) + late_left(sides(body, -1.1), 9)
    return near + echoes(SLIPS + PRESSES, TICK_TAIL, wet_db=10.0)


# start_s, hardest_s, end_s, level_db, from_hz, to_hz
CREAKS = [
    (8.399, 8.412, 7.9, -60.5, 2410, 2550),
    (8.5, 8.533, 8.565, -54, 1650, 1384),
    (8.52, 8.557, 8.6, -55, 1328, 1223),
    (8.526, 8.547, 8.58, -52.5, 2170, 2300),
]


def creak():
    out = np.zeros(N)
    noise = rng.standard_normal((len(CREAKS), 2, N // 8))
    wobble = unit(signal.lfilter([1], [1, -.994], noise))
    first = int(CREAKS[0][0] * SR) - SR // 10
    near = slice(first, first + N // 8)
    for (start_s, hardest_s, end_s, db, from_hz, to_hz), (a, b) in zip(CREAKS, wobble):
        hz = np.interp(T[near], (start_s, end_s), (from_hz, to_hz))
        phase = 2 * np.pi * np.cumsum(hz) / SR
        squeak = a * np.sin(phase) + b * np.cos(phase)
        out[near] += stroke(start_s, hardest_s, end_s, db)[near] * squeak
    return late_left(sides(out, -1.8), 6)


def scene():
    return hiss() + bumps() + lighter() + rubbing() + mallet() + knife() + ticks() + creak()


def band_limit(x):
    return signal.sosfilt(signal.butter(12, 16100, fs=SR, output="sos"), x)


def record(dry):
    ceiling = .95
    thin = signal.sosfilt(signal.butter(1, 40, "high", fs=SR, output="sos"), dry)
    rounded = np.tanh(thin / ceiling) * ceiling
    mix = signal.sosfilt(signal.ellip(6, .3, 28, 15700, fs=SR, output="sos"), rounded)
    return band_limit(mix)


dry = scene()
out = record(dry)
store_pcm(out)
```